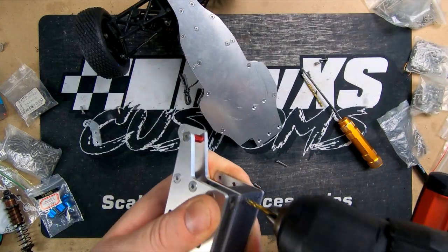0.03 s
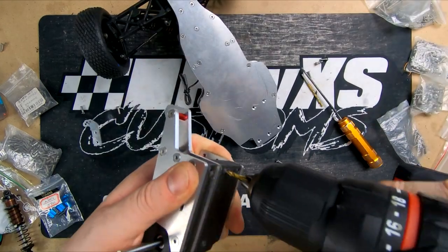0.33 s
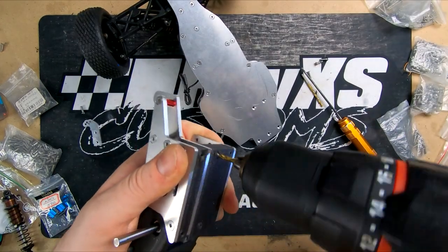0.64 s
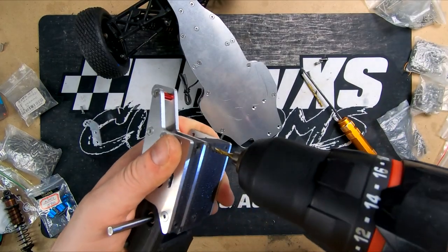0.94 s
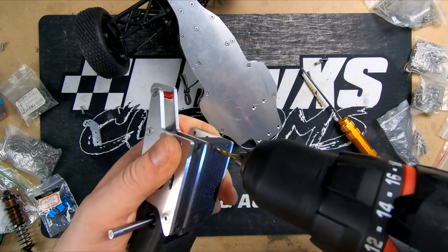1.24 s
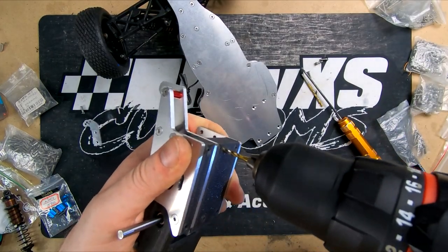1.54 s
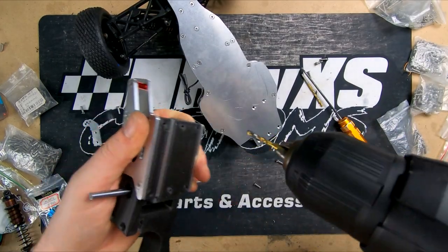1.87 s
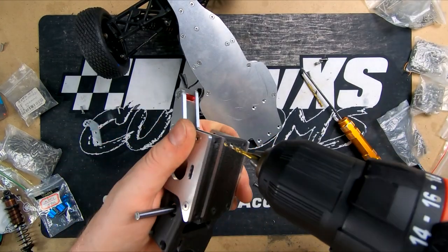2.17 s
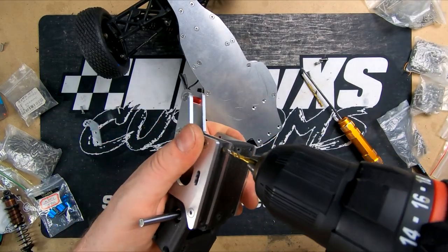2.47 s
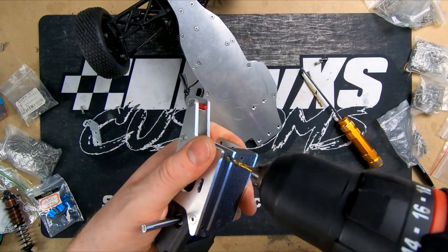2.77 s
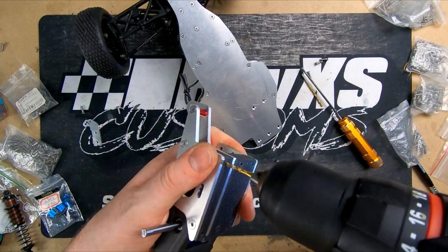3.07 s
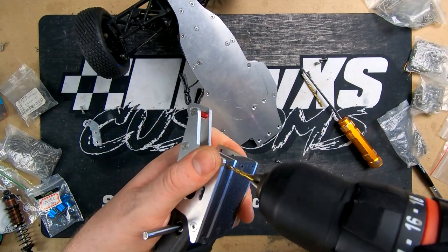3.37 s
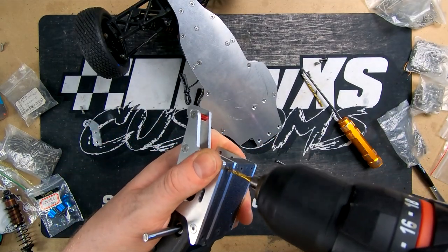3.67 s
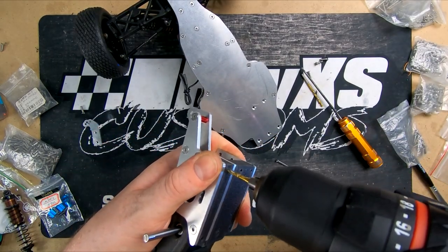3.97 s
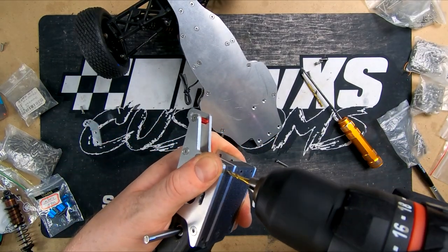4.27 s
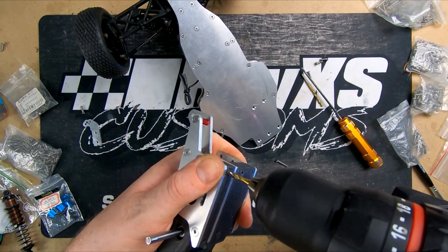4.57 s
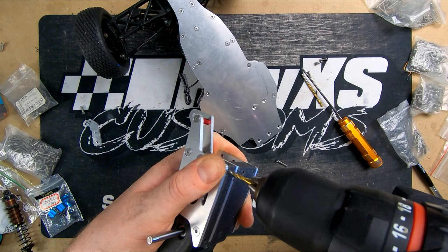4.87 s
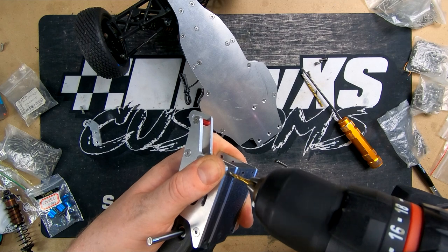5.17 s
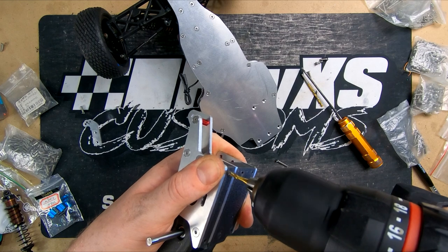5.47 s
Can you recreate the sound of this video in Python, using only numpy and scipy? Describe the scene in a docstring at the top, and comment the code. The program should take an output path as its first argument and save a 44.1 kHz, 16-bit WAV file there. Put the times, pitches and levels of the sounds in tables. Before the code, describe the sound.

Close up in a quiet, slightly reverberant workshop, a cordless drill cuts a thread in metal. A short forward run ends, the direction switch clicks, and the drill reverses with a loud, rough gear rattle that drops in pitch and stops abruptly, clicking. About a second later a longer forward run starts, whining and rattling with a steady high electronic whistle as the motor gradually slows. Faint room noise lies underneath.

```python
"""A cordless drill whines and rattles as it slowly turns a tap through a small metal part in a workshop.
It is switched over, backs out in a loud burst, brakes, then cuts forward again, slowing under load.
Gear meshes and motor poles sound at multiples of the shaft speed, and tooth impacts excite the body.
The speed controller makes the windings whistle; switch, spindle lock and tap click.
Short reverberation surrounds the drill, over quiet room noise and a faint hum."""
import sys
import numpy as np
from scipy import signal
from scipy.fft import rfft, irfft, next_fast_len
from scipy.io import wavfile

SR = 44100
rng = np.random.default_rng(int(sys.argv[2]) if len(sys.argv) > 2 else 0)


def master(y):
    """Save y as 16-bit WAV."""
    cut = np.clip(np.atleast_2d(y).T, -1, 1)
    pcm = np.round(cut * 32767)  # scale
    wavfile.write(sys.argv[1], SR, pcm.astype(np.int16))


N = 247401
T = np.arange(N) / SR

# runs of the drill: (trigger pressed [s], let go [s], base gear level [dB], attack [s], run-down [s])
FIRST_RUN = (-.5, .3, -42.1, .04, .1)
BACK_OUT = (.665, 1.82, -36.4, .04, .04)
SECOND_RUN = (2.801, 5.56, -41.4, .045, .2)
# speed that trigger and load allow while backing out: (time [s], speed [turns/s])
BACK_OUT_SPEED = [(.76, 65.5), (.865, 90.5), (1, 67), (1.11, 55), (1.24, 47.4), (1.38, 44.2)]
# radiation of the drill body, running forward or coasting: (frequency [Hz], gain [dB])
FORWARD_BODY = [(200, -62), (400, -21.5), (560, -11), (900, -9), (1300, -6.5), (1800, -8.5), (2300, 0.5),
                (2950, -7.5), (3650, -4.5), (4500, -11), (6900, -9), (8200, -13), (10500, -23),
                (15500, -31.5)]
WHISTLE_ATTACK_S, WHISTLE_RELEASE_S = .0066, .012


def from_db(db):
    """Amplitude ratio of a level in decibels."""
    return 10 ** (np.asarray(db) / 20)


def rms_one(x):
    """Normalisation to unit power."""
    return x / np.sqrt(np.mean(x ** 2) + 1e-20)


def at_hz(points, hz):
    """Interpolation on a logarithmic frequency axis."""
    f, value = np.transpose(points)
    return np.interp(np.log(hz + 1e-3), np.log(f), value)


def colour(x, spectrum):
    """Filtering as multiplication in the frequency domain."""
    n = next_fast_len(len(x) + 2048)
    gain = from_db(at_hz(spectrum, np.fft.rfftfreq(n, 1 / SR)))
    return irfft(rfft(x, n) * gain, n)[:len(x)]


def drift(corner_hz):
    """Slow random fluctuation: low-passed noise of unit power."""
    pole = np.exp(-80 * np.pi * corner_hz / SR)
    noise = rng.standard_normal(N // 40 + 2002)
    slow = signal.lfilter([1], [1, -2 * pole, pole * pole], noise)[2000:]
    return np.interp(np.arange(N) / 40, np.arange(len(slow)), rms_one(slow))


def angle(hz):
    """Phase as the integral of frequency."""
    return 2 * np.pi * np.cumsum(hz) / SR


def held(start, stop, level_db, attack_s, release_s):
    """Envelope: quadratic rise, hold, then exponential decay of 60 dB in the release time."""
    rise = np.clip((T - start) / attack_s, 0, 1) ** 2
    return rise * from_db(level_db - 60 * np.clip((T - stop) / release_s, 0, 2))


def background():
    """Superposition of steady room noise and a swelling hum with a partial a fifth above."""
    # swells of the hum: (start [s], stop [s], level [dB], attack [s], release [s])
    swells = [(3.3, 5.14, -60.5, 1.6, 0.44), (5.25, 5.42, -68, .12, .7)]
    # room noise spectrum: (frequency [Hz], relative level [dB])
    noise_spectrum = [(20, -1.5), (40, -7), (62, -8), (120, -13.5), (300, -14), (400, -12.5), (570, -23),
                      (750, -17.5), (1100, -20), (2100, -22), (4000, -31.5), (8000, -35), (16000, -43)]
    phase = 2 * np.pi * 138 * T
    partials = np.sin(phase) + from_db(-13.5) * np.sin(phase * 3 / 2)
    hum = np.sqrt(2) * sum(held(*swell) for swell in swells) * partials
    return hum + from_db(-61.5) * rms_one(colour(rng.standard_normal(N), noise_spectrum))


def reverberation(x):
    """Convolution with the workshop's diffuse field, which decays exponentially in each band."""
    # decay of the room: (frequency [Hz], reverberation time [s])
    room_t60 = [(200, 0.85), (1000, 0.52), (4000, 0.43), (8000, 0.51), (12000, 0.24)]
    t, tail = np.arange(SR * 3 // 4) / SR, 0
    edges_hz = np.geomspace(450, 13000, 8)
    for low, high in zip(edges_hz, edges_hz[1:]):
        bandpass = signal.butter(2, [low, high], "band", fs=SR, output="sos")
        band = signal.sosfilt(bandpass, rng.standard_normal(len(t)))
        decay = from_db(-60 * t / at_hz(room_t60, np.sqrt(low * high)))
        tail = tail + band * decay * (t > .004)
    return signal.fftconvolve(x, tail / np.linalg.norm(tail))[:N]


def clicks(ring_width_hz=450, body_t60=.089, body_db=-17):
    """Impact excitation: milliseconds of chatter leave the housing and one hard part ringing."""
    # direction switch, spindle lock and tap: (time [s], relative peak [dB], ring frequency [Hz],
    # relative ring level [dB], treble gain [dB], chatter length [s])
    impacts = [(0.347, -38, 2410, 9, -21, 0.0017), (0.413, -47, 5500, 5, -5, 0.0046),
               (0.428, -44.5, 5240, -9, -10, 0.0058), (0.5298, -18, 8600, -4, 12, 0.0041),
               (0.556, -27, 7950, -10, 8, 0.0018), (0.636, -32, 5260, -20, -4, 0.012),
               (.665, -18, 8200, 2, -3.5, 0.0042), (0.686, -19.5, 7900, 6, -4, 0.0024),
               (1.806, -16, 2310, -9, 1, 0.003), (1.825, -16.5, 4040, -7, 1, 0.0037),
               (1.922, -22.5, 7420, 3, 2, 0.0041), (1.9453, -28, 4100, -21, -2.5, 0.0054),
               (2.665, -49, 5650, -1, 3, 0.0053), (2.811, -41, 2200, -10, 5, 0.0027)]
    # response of the struck housing: (frequency [Hz], gain [dB])
    housing = [(200, -16.5), (500, -5), (1300, 4.5), (2300, 5), (2900, 4), (3800, 4), (5000, 4),
               (7500, 0.5), (10000, -8), (15500, -17)]
    out, t = np.zeros(N + SR), np.arange(SR // 8) / SR
    for time, peak_db, ring_hz, ring_db, treble_db, length in impacts:
        envelope = np.exp(-(t / length) ** 2) + from_db(body_db - 60 * t / body_t60)
        spectrum = [(hz, db + treble_db * (hz > 6000)) for hz, db in housing]
        chatter = colour(envelope * rng.standard_normal(len(t)), spectrum)
        ring = signal.lfilter(*signal.iirpeak(ring_hz, ring_hz / ring_width_hz, fs=SR), chatter)
        click = chatter + from_db(ring_db + 10) * ring
        click /= 3 * np.std(click[:SR // 500])  # the first 2 ms peak near one
        at = round(time * SR)
        out[at:at + len(t)] += from_db(peak_db + .5) * click
    return out[:N]


def motor_speed(spin_up_s=.05):
    """Inertia: the speed [turns/s] rises and runs down exponentially; it dips where the tap catches."""
    # speed that trigger and load allow in the forward runs: (time [s], speed [turns/s])
    first_speed = [(0, 59.8)]
    second_speed = [(2.9, 120), (3.18, 126), (3.39, 114.8), (3.6, 108), (3.88, 100.7), (4.37, 91.6),
                    (4.86, 83.6), (5.42, 77.2), (5.56, 74)]
    # catches of the tap: (time [s], speed lost [turns/s], half length [s])
    snags = [(.11, 1.2, .03), (.23, 1.4, .03), (4.67, 1.2, .05), (4.99, 2.7, .06), (5.26, 2.4, .07)]
    speed = np.ones(N)
    for run, curve in (FIRST_RUN, first_speed), (BACK_OUT, BACK_OUT_SPEED), (SECOND_RUN, second_speed):
        start, stop, _, _, run_down_s = run
        allowed = np.interp(T, *np.transpose(curve))
        spin_up = 1 - np.exp(-np.maximum(T - start, 0) / spin_up_s)
        run_down = np.exp(-np.maximum(T - stop, 0) / run_down_s)
        speed = np.maximum(speed, allowed * spin_up * run_down)
    return speed - sum(lost * np.exp(-((T - time) / length) ** 2) for time, lost, length in snags)


def whistle(switch_hz, speed, tones, waver_db):
    """Modulation: the windings sing at the switching rate, with sidebands from the turning rotor."""
    out = 0
    for harmonic, sideband, level_db, wobble in tones:
        gain = from_db(level_db + waver_db * drift(25))
        out = out + gain * np.sin(angle(harmonic * switch_hz + sideband * speed) + wobble * drift(60))
    return np.sqrt(2) * out


def rattle(speed, body, knock_db, throb, flutter_db):
    """Friction and impact noise of gear teeth, amplitude-modulated six times a turn by the motor poles."""
    turn = angle(speed)
    knocks = (rng.random(N) < 9 * speed / SR) * rng.standard_normal(N)
    contact = rng.standard_normal(N) + from_db(knock_db) * rms_one(knocks)
    push = 1 + throb * np.cos(6 * turn + .6 * drift(20))
    # the planet carrier runs slightly out of true
    sway = from_db(flutter_db * (drift(44) + .34 * np.sin(turn / 11)))
    return rms_one(colour(contact * push * sway, body))


def whine(speed, tones, resonances, loaded_speed, waver_db, bite_db):
    """Forced vibration at multiples of the speed, raised by housing resonances and cleaner under load."""
    turn, out = angle(speed), 0
    easing = np.log2(speed / loaded_speed)  # doublings of speed as the load eases
    for multiple, level_db, wobble, loss_db in tones:
        load_db = -loss_db * np.maximum(easing, 0) - bite_db * np.clip(easing, -1, 0)
        gain = from_db(level_db + load_db + at_hz(resonances, multiple * speed) + waver_db * drift(11.7))
        out = out + gain * np.sin(multiple * turn + wobble * speed / loaded_speed * drift(33))
    return np.sqrt(2) * out


def coasting(speed):
    """Backlash: the unloaded gears rattle as they coast, creep or are braked."""
    # spells of loose rattle: (start [s], stop [s], level [dB], attack [s], release [s])
    spells = [(.3, .43, -66, .02, .3), (.54, .665, -47.5, .125, .05), (.662, .745, -35.5, .02, .15),
              (1.797, 1.825, -34, .013, .04), (1.83, 1.84, -62, .01, .45), (2.7, 2.8, -64, .07, .05)]
    envelope = sum(held(*spell) for spell in spells)
    return envelope * rattle(speed, FORWARD_BODY, knock_db=-2, throb=.3, flutter_db=1.5)


def forward(speed, entry_db=-3.5, bite_s=.2):
    """Gear meshing under cutting load: whine over rattle, with the whistle of a light trigger."""
    # gear and pole tones: (multiple of speed, relative level [dB], wobble [rad], loss [dB/doubling])
    gear_tones = [(3.86, -13.5, .2, 0), (4.82, -21, .2, 0), (5.78, -11.5, .2, 0), (6, -20, .2, 8),
                  (6.75, -20, .2, 0), (7.7, -16, .3, 10), (9.62, -18, .3, 35), (9.81, -21, .3, 30),
                  (12, -9.5, .2, 12), (18, -14, .4, 10), (24, -12, .35, 8), (30, -11.5, .6, 45),
                  (35.9, -8.5, .5, 16), (41.9, -11, .6, 50), (47.9, -11, .8, 50), (53.8, -13, 1.1, 40),
                  (59.8, -14, 1.1, 40), (65.9, -12, .9, 40)]
    # response of the gear housing: (frequency [Hz], gain [dB])
    resonances = [(300, -24), (400, -14), (590, -4), (800, -13), (980, -9), (1120, 0), (1230, -8.5),
                  (1350, 0.5), (1520, -9), (1800, 0), (2150, -2), (2650, -0.5), (3000, -14.5), (3500, 0.5),
                  (4400, -18), (5200, -2), (6000, -16)]
    # whistle on a light trigger: (start [s], stop [s], level [dB])
    presses = [(-.5, .292, -45.6), (.618, .645, -51), (2.808, 5.56, -46.7)]
    # switching tones: (harmonic, sideband [multiples of speed], relative level [dB], wobble [rad])
    switching_tones = [(1, 0, -3, .1), (1, 4, -14, .6), (1, -4, -28.5, .6), (2, -2, -21.5, 1.2),
                       (2, 2, -25, 1.2)]
    gears = from_db(-.92) * rattle(speed, FORWARD_BODY, knock_db=-9, throb=.15, flutter_db=1.02)
    gears += whine(speed, gear_tones, resonances, loaded_speed=92, waver_db=1.8, bite_db=4)
    switch_hz = 6562 - 1.2 * speed
    trigger = sum(held(*press, WHISTLE_ATTACK_S, WHISTLE_RELEASE_S) for press in presses)
    controller = trigger * whistle(switch_hz, speed, switching_tones, waver_db=.5)
    # the gears are quieter until the tap has bitten
    entry = from_db(entry_db * np.exp(-np.abs(T - SECOND_RUN[0]) / bite_s))
    return (held(*FIRST_RUN) + held(*SECOND_RUN) * entry) * gears + controller


def reverse(speed, db_per_doubling=6, freeing_db_per_s=5, growl_db=-51):
    """Gear meshing in reverse: harsh rattle and whine, with the growl and whistle of a deep trigger."""
    # radiation of the drill body and response of the gear housing: (frequency [Hz], gain [dB])
    body = [(200, -21.5), (400, -14.5), (620, -10.5), (900, -9.5), (1600, -2), (2300, 3), (3000, 0),
            (5000, -3), (7000, 3), (8200, -5), (9500, -5), (10600, -10.5), (15500, -16)]
    resonances = [(200, -25), (310, -30), (400, -5.5), (800, -1.5), (1100, -7), (1600, -1.5), (2250, 6),
                  (3200, -1.5), (4800, 0), (6400, 5), (8000, -6)]
    # gear and pole tones: (multiple of speed, relative level [dB], wobble [rad], loss [dB/doubling])
    gear_tones = [(6.03, -17, .3, 0), (12, -19, .2, 10), (18, -20, .3, 10), (21, -18, .3, 10),
                  (24, -19, .3, 8), (26, -15, .3, 4), (30, -20, .4, 12), (36, -13, .2, -2),
                  (45, -19, .6, 12), (56, -12, .7, 18), (108, -13, .4, 90), (144, -12, .9, 90)]
    # deep trigger: (start [s], stop [s], whistle level [dB])
    press = (.735, 1.825, -46)
    # switching tones: (harmonic, sideband [multiples of speed], relative level [dB], wobble [rad])
    switching_tones = [(1, 0, 5, .3), (1, -3, -5, 1.3), (1, 3, -5, 1.3), (1, -9, -7.5, .8), (1, 9, -4, .6),
                       (1, -15, -13, 3), (1, -21, -16, 3), (1, 18, -17, 3)]
    # growl of the current surge at spin-up: (start [s], stop [s], level [dB], attack [s], release [s])
    surge = (.725, .798, -32, .072, .07)
    gears = from_db(2.5) * rattle(speed, body, knock_db=-7.5, throb=.11, flutter_db=.54)
    gears += whine(speed, gear_tones, resonances, loaded_speed=45, waver_db=1.5, bite_db=0)
    # the gearbox is louder the faster it is driven and quietens as the tap works free
    doublings = np.maximum(np.log2(speed / BACK_OUT_SPEED[-1][1]), 0)
    effort_db = db_per_doubling * doublings - freeing_db_per_s * (T - BACK_OUT[0])
    start, stop, whistle_db = press
    current = held(start, stop, growl_db, WHISTLE_ATTACK_S, WHISTLE_RELEASE_S) + held(*surge)
    growl = current * np.sqrt(2) * np.sin(9 * angle(speed) + .15 * drift(30))
    switch_hz = 13985 + 20 * drift(8) + 35 * drift(200)
    fade_db = .45 * np.maximum(speed - 60, 0)  # near full speed the controller hardly chops
    trigger = held(start, stop, whistle_db - fade_db, WHISTLE_ATTACK_S, WHISTLE_RELEASE_S)
    controller = trigger * whistle(switch_hz, speed, switching_tones, waver_db=1.5)
    return held(*BACK_OUT) * from_db(effort_db) * gears + growl + controller


def scene():
    """Direct and diffuse sound: the drill is close and almost the same left and right."""
    # faint left-right difference of a nearly mono sound: (frequency [Hz], gain [dB])
    width = [(50, 3), (500, -36.5), (2500, -62), (5000, -62), (9000, -44.5), (15000, -25)]
    speed = motor_speed()
    drill = coasting(speed) + forward(speed) + reverse(speed) + clicks()
    mid = drill + from_db(-14) * reverberation(drill) + background()
    side = colour(reverberation(drill), width)
    return np.array([mid + side, mid - side])


def record(dry):
    """Band limiting: an elliptic low-pass cuts the highest treble steeply."""
    cutoff_hz = 15850
    return signal.sosfilt(signal.ellip(12, .1, 80, cutoff_hz, fs=SR, output="sos"), dry)


dry = scene()
out = record(dry)
master(out)
```